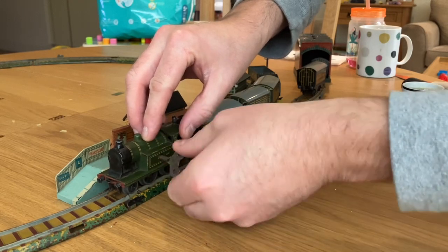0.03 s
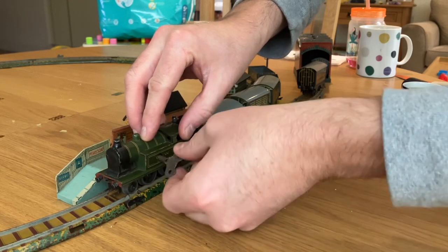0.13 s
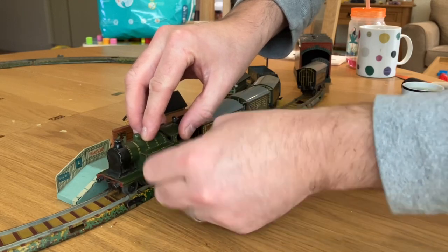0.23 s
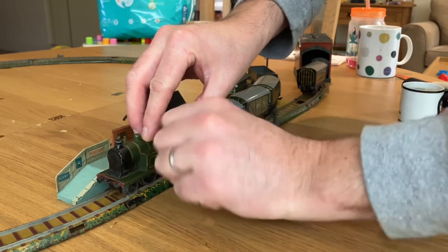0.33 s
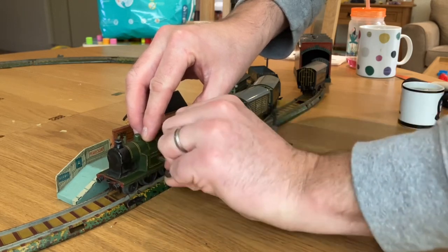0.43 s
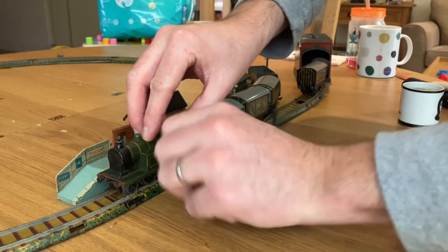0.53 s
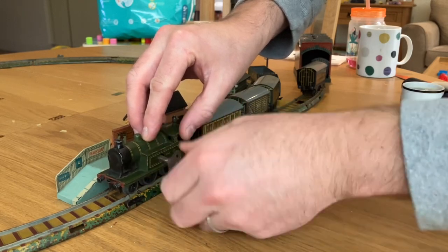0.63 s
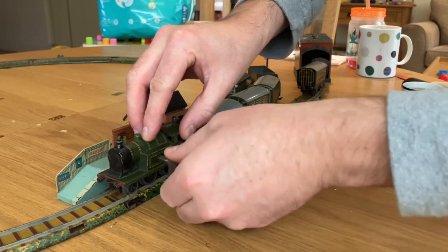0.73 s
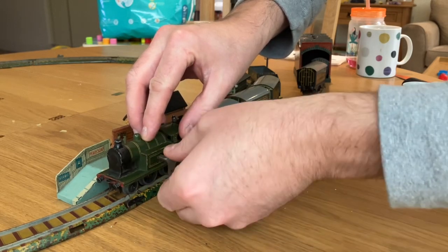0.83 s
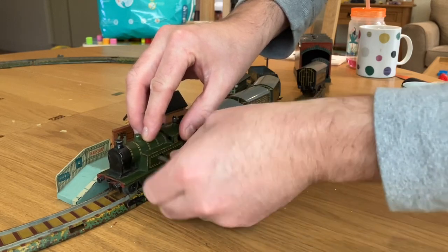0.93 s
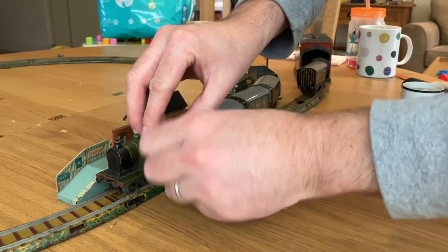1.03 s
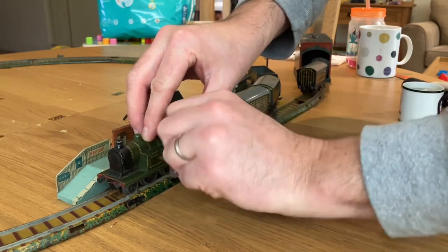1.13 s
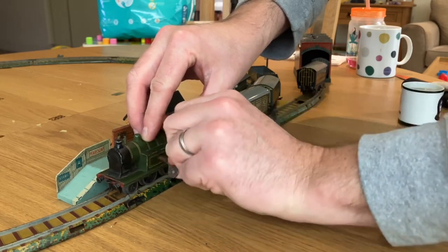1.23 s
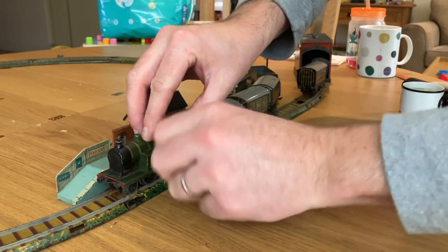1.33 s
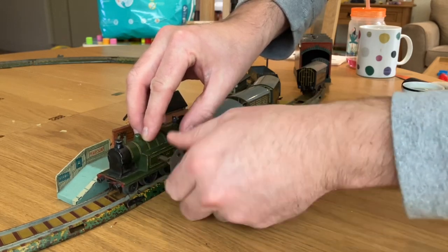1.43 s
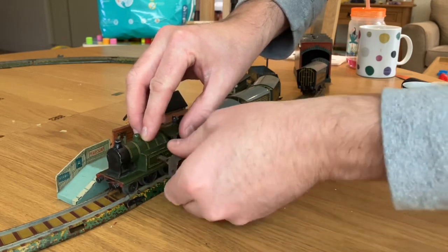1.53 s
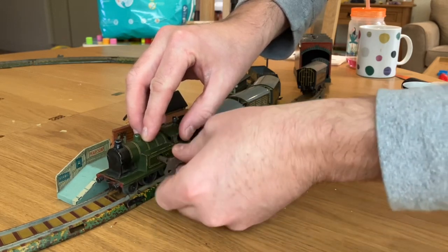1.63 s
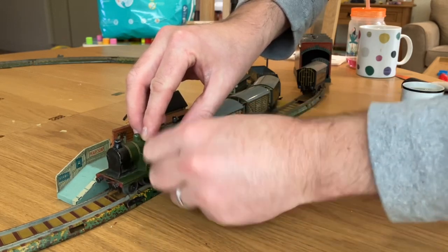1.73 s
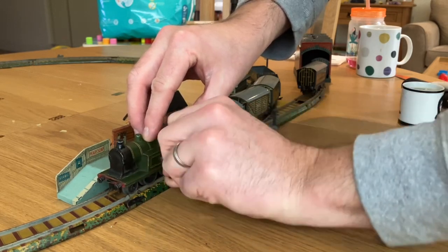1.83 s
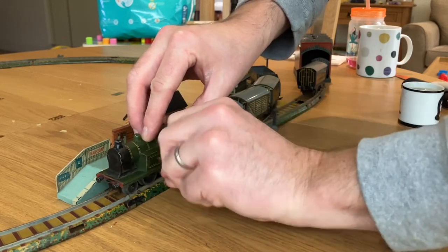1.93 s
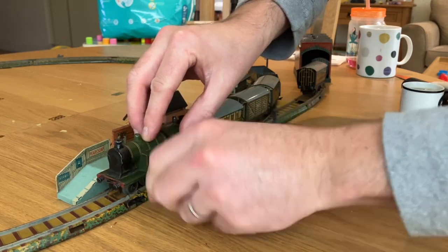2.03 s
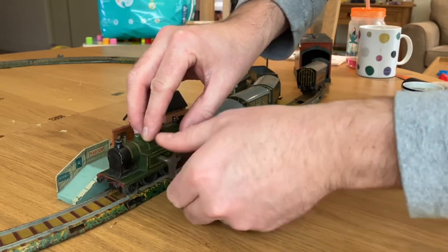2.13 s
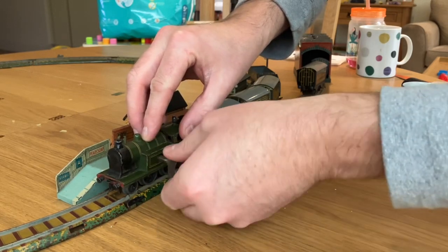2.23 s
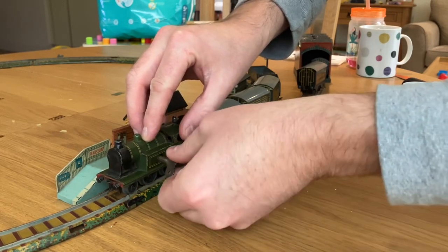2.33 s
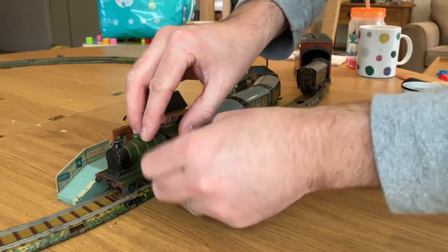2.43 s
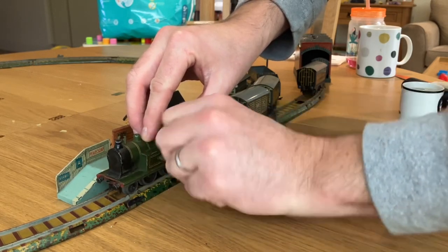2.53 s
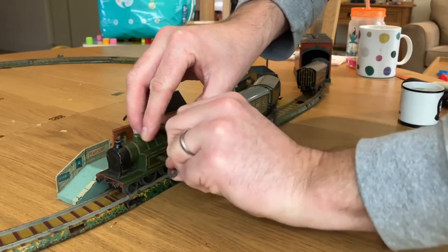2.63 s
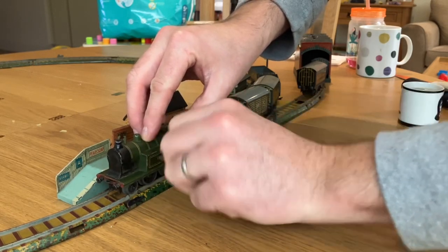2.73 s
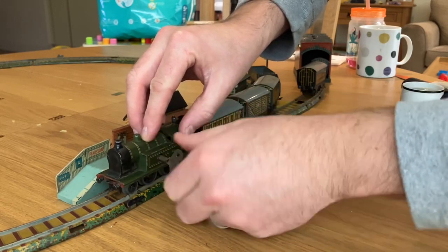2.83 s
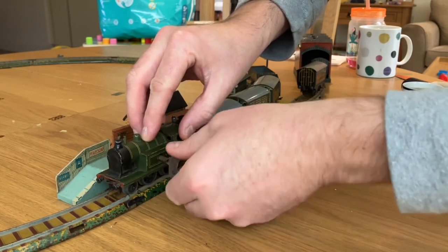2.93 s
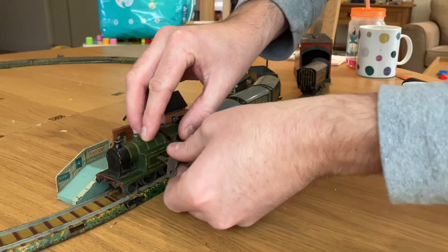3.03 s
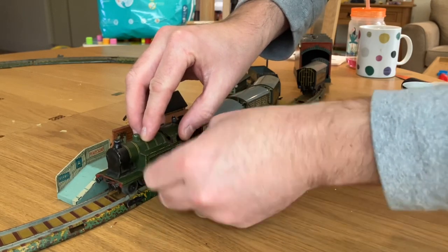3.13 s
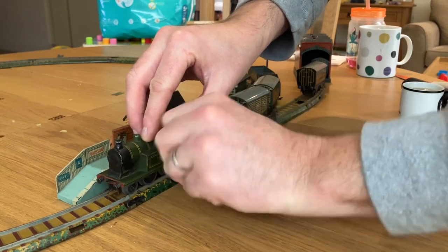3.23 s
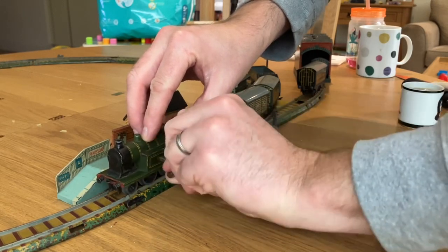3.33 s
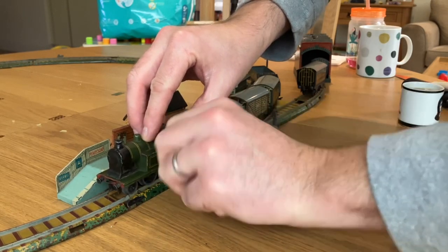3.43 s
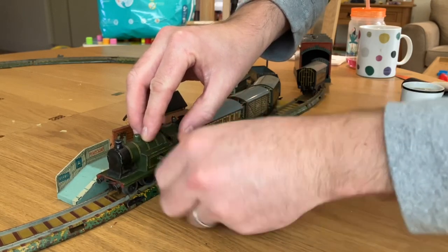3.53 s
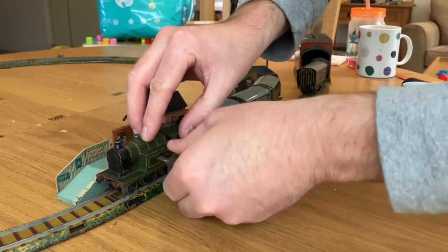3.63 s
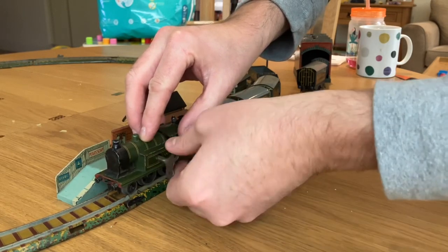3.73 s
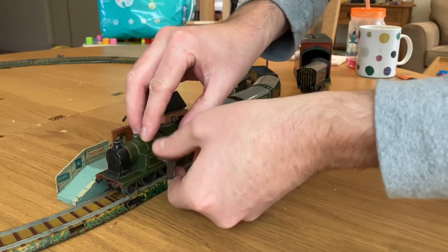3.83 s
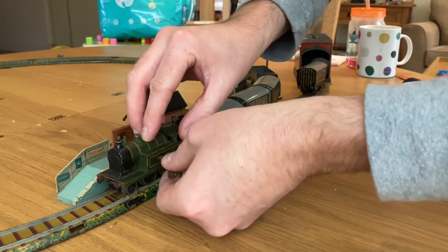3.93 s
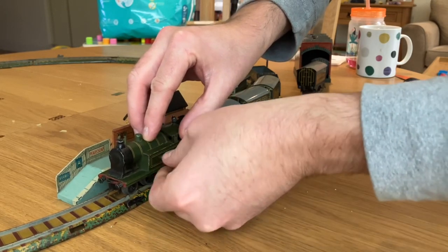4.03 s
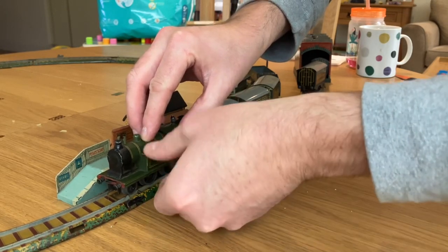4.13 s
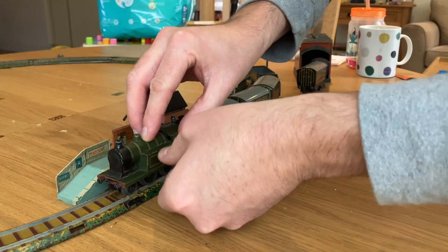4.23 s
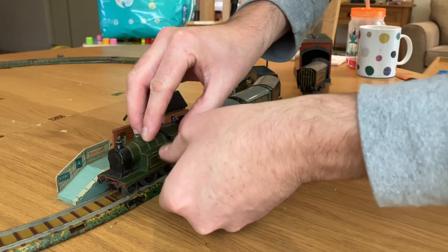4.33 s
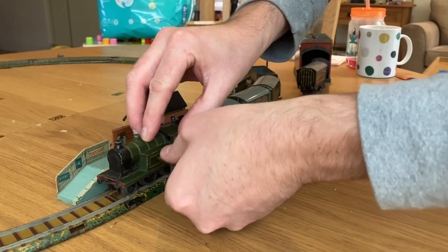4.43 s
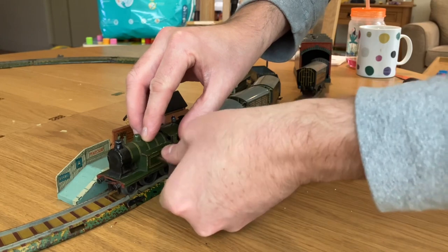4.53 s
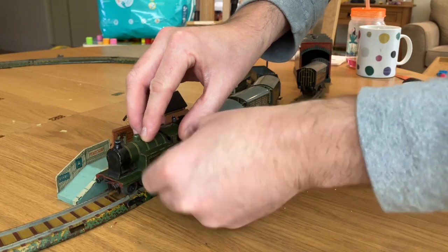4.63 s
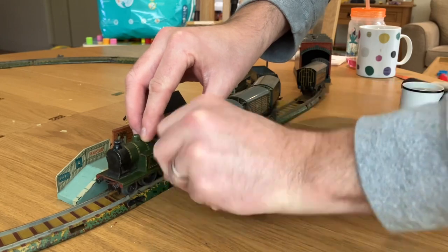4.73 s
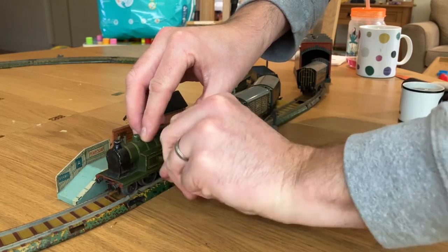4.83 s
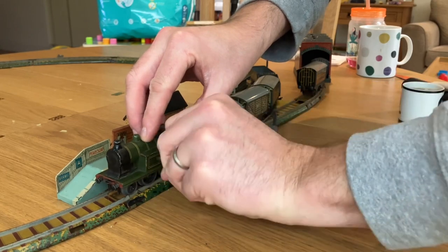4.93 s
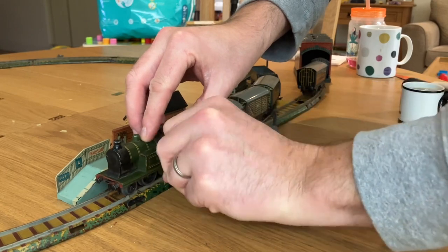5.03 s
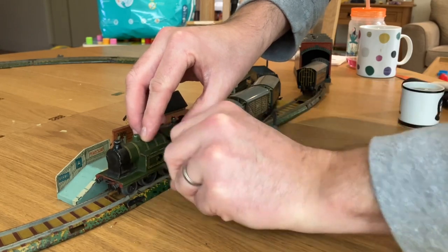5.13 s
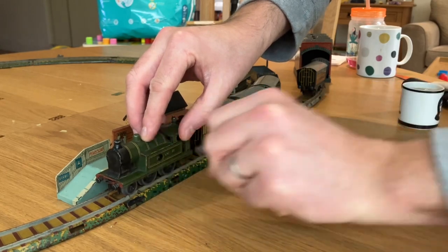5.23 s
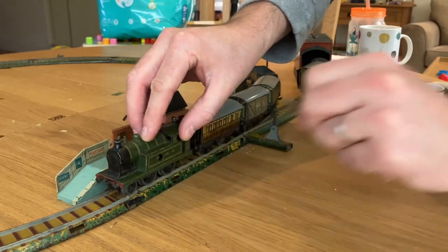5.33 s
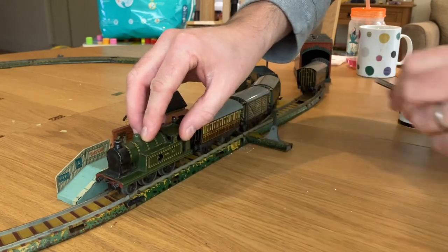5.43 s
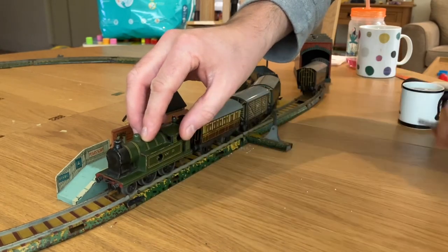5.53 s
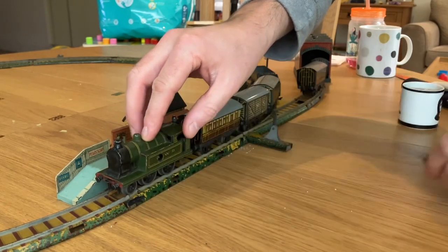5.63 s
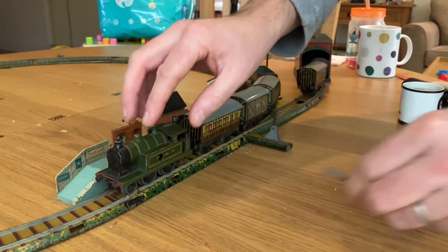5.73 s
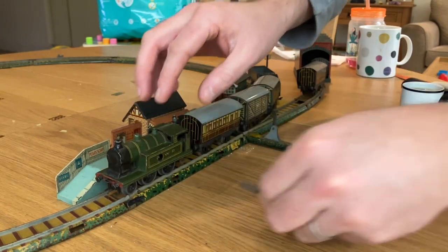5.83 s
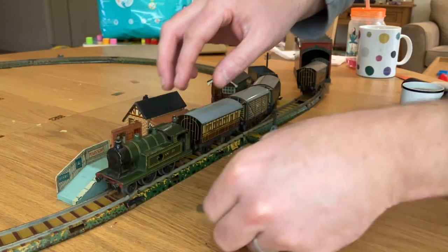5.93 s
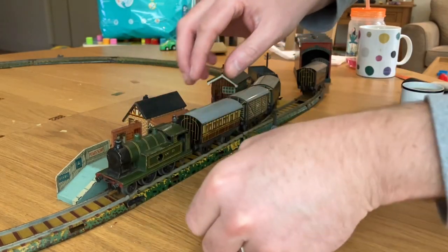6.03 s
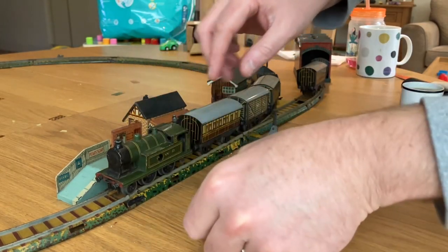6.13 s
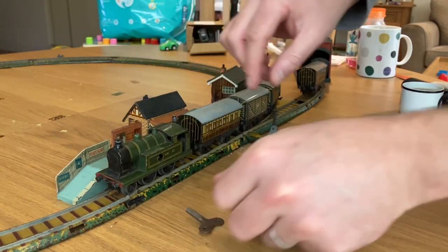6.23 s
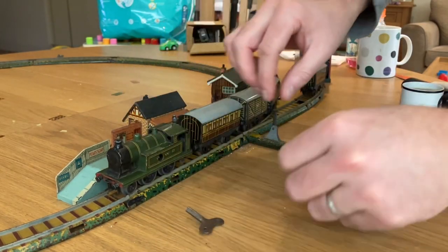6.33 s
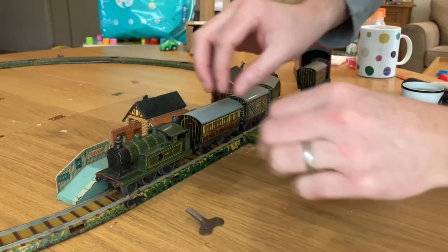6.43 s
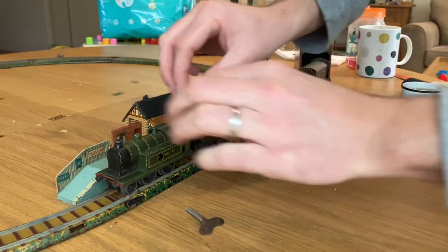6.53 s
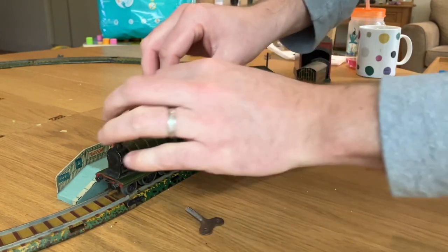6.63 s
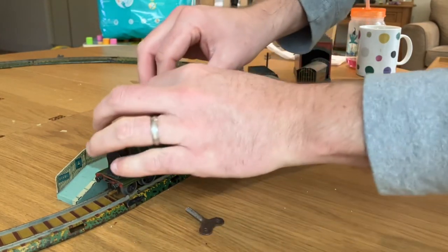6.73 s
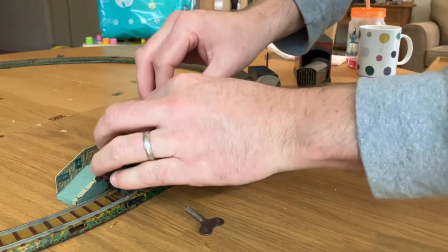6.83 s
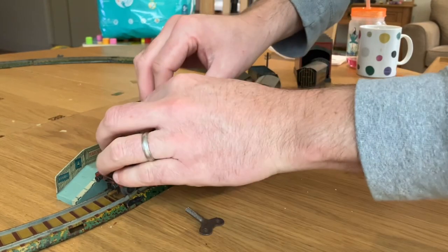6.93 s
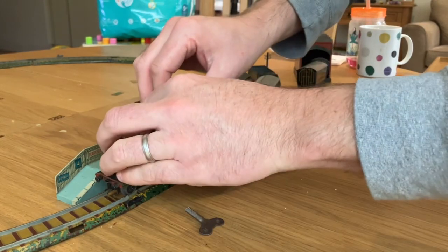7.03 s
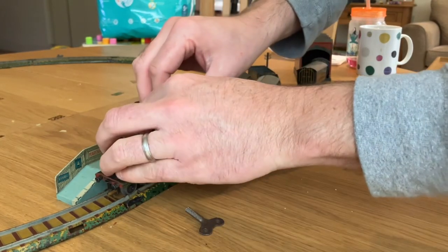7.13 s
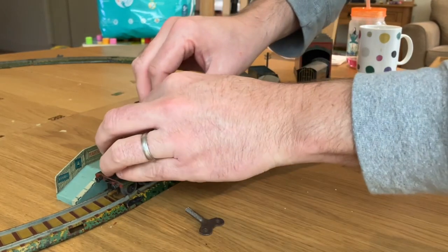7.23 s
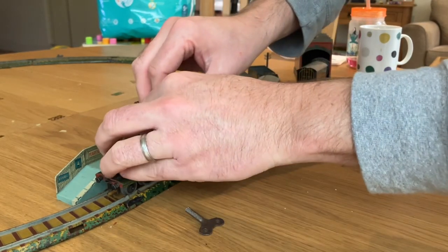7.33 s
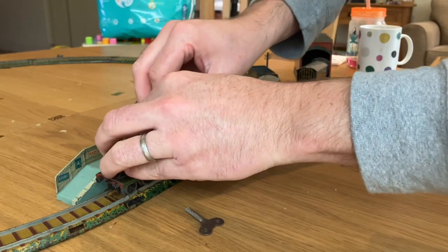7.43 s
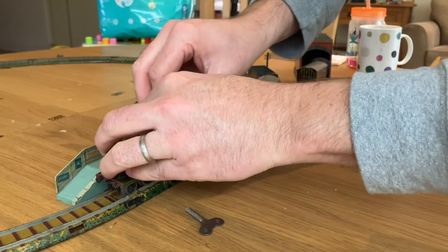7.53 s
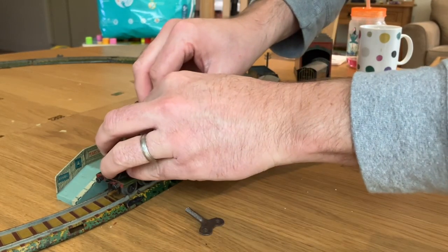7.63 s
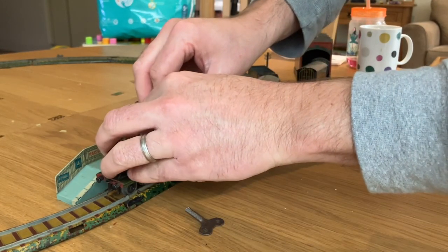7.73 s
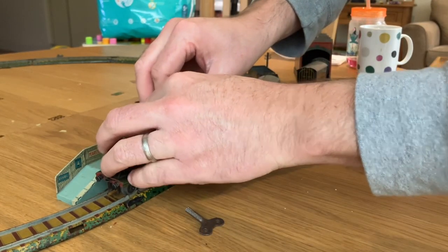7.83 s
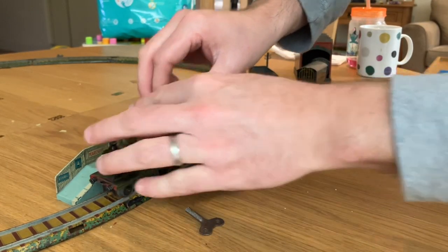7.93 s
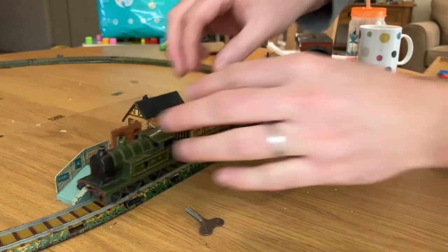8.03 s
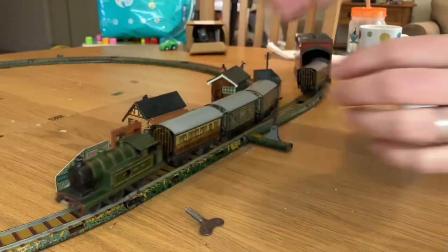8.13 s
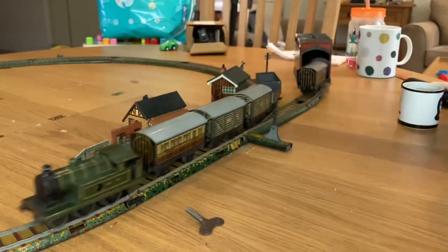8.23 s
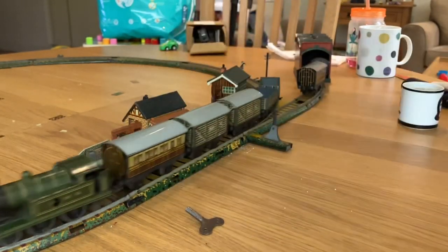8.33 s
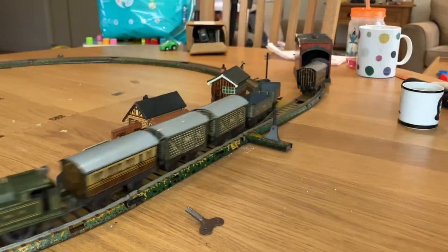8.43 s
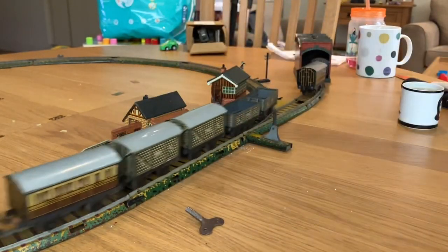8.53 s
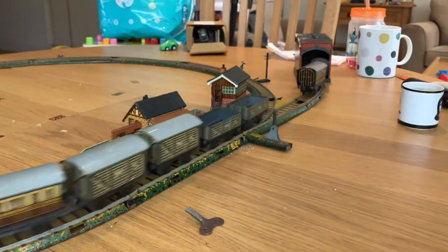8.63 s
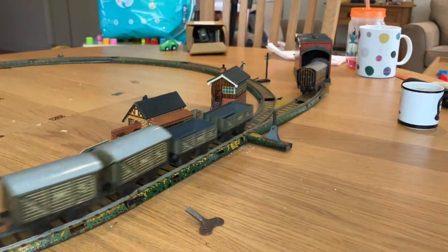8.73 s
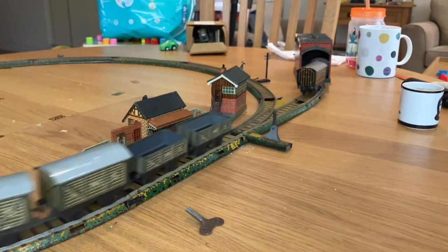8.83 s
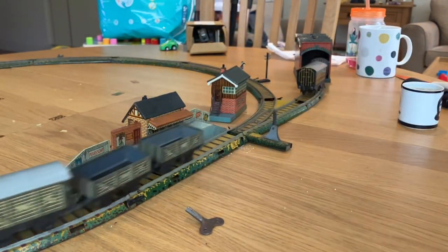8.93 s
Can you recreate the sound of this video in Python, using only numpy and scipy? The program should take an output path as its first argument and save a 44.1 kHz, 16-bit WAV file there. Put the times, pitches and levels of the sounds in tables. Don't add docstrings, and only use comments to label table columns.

```python
import sys
import numpy as np
from scipy import signal
from scipy.fft import rfft, irfft
from scipy.io import wavfile
from scipy.ndimage import uniform_filter1d

SR = 44100
rng = np.random.default_rng(int(sys.argv[2]) if len(sys.argv) > 2 else 0)


def file_out(sig):
    cols = np.atleast_2d(sig).T
    lim = np.clip(cols, -1, 1)
    pcm = np.round(lim * 32767).astype(np.int16)
    wavfile.write(sys.argv[1], SR, pcm)


def volts(x):
    e = np.asarray(x, float) / 20
    return 10 ** e


N = 396459


def rms_one(x):
    return x / np.sqrt(np.mean(x ** 2) + 1e-20)


def in_time(rows):
    s, *columns = np.transpose(rows)
    return [np.interp(np.arange(N) / SR, s, column) for column in columns]


def band(x, low_hz, high_hz):
    sos = signal.butter(2, [low_hz, min(high_hz, .45 * SR)], "band", fs=SR, output="sos")
    return signal.sosfilt(sos, x)


def no_bass(x):
    return signal.sosfilt(signal.butter(6, 930, "high", fs=SR, output="sos"), x)


def drift(rate_hz, size=N):
    knots = rng.standard_normal(1000)
    return np.interp(np.arange(size) * rate_hz / SR, np.arange(1000), knots)


def swell(start_s, end_s, db, rise_db_per_s, fall_db_per_s):
    t = np.arange(0, N, 32)[:, None] / SR
    early_s = np.maximum(start_s - t, 0)
    late_s = np.maximum(t - end_s, 0)
    gain = volts(db - rise_db_per_s * early_s - fall_db_per_s * late_s).sum(axis=1)
    return np.interp(np.arange(N) / SR, t[:, 0], gain)


def grains(per_s, uneven_db, shape):
    sizes = volts(uneven_db * np.minimum(rng.exponential(1, shape), 4)) * rng.choice([-1, 1], shape)
    return sizes * (rng.random(shape) < per_s / SR)


def ring(clicks, hz, t60):
    r, w = volts(-60 / (t60 * SR)), 2 * np.pi * hz / SR
    return signal.lfilter([0, np.sin(w)], [1, -2 * r * np.cos(w), r * r], clicks + 1e-18)


def strike(times, peak_db, modes, uneven_db, chatter_s, tilt_db=0, loudest_hz=None, detune=.05):
    hz, db, t60 = np.transpose(modes)
    draw = rng.standard_normal((len(times), 2, len(modes)))
    after = np.arange(600)
    fade = (after + 1) ** .5 * np.exp(-after / (chatter_s * SR))
    chatter = rng.choice([-1, 1], (len(times), 600)) * fade / np.sqrt(np.sum(fade ** 2))
    hz = hz * (1 + detune * np.clip(draw[:, 1], -2, 2))
    waves = np.exp(2j * np.pi * hz[..., None] / SR * after)
    reach = np.abs(np.sum(chatter[:, None] * waves, axis=2))
    db = db + uneven_db * np.clip(draw[:, 0], -1, 1)
    db = db + np.reshape(tilt_db, (-1, 1)) * np.log2(hz / 2000)
    if loudest_hz is not None:
        away = np.log2(hz / np.reshape(loudest_hz, (-1, 1))) / 0.2
        db = db + 9 * (np.exp(-away ** 2) - .5)
    gain = volts(np.reshape(peak_db, (-1, 1)) + db) / (reach + 0.65)
    t = np.arange(int(t60.max() * SR) + 1) / SR
    rings = 0
    for k in range(len(modes)):
        decay = np.exp(-np.log(1000) * t / t60[k])
        rings = rings + gain[:, [k]] * np.sin(2 * np.pi * hz[:, [k]] * t) * decay
    blows = signal.fftconvolve(rings, chatter, axes=1)
    at = (np.asarray(times) * SR).astype(int)[:, None] + np.arange(blows.shape[1])
    return np.bincount(at.ravel(), blows.ravel(), N)[:N]


def place(x, left_db, lag_s=0.00011):
    late = np.interp(np.arange(N) - lag_s * SR, np.arange(N), x)
    return np.array([x * volts(left_db / 2), late * volts(-left_db / 2)])


def scattered(x, width_hz):
    sos = signal.butter(2, width_hz, fs=SR, output="sos")
    return x * rms_one(signal.sosfilt(sos, rng.standard_normal(N)))


# pitch_hz, level_db
QUIET_ROOM = [(15, -42), (25, 12), (83, -4), (257, -9), (790, -29.5), (1240, -12), (1540, -25.5),
              (3730, -17), (4500, -27), (7890, -28), (9270, -57.5), (10900, -29.5), (15000, -63.5)]


def room_tone():
    hz = np.fft.rfftfreq(N, 1 / SR) + 1
    colour_hz, colour_db = np.transpose(QUIET_ROOM)
    colour = volts(np.interp(np.log(hz), np.log(colour_hz), colour_db))
    mid, side = rfft(rng.standard_normal((2, N)))
    alike = np.clip(.9 - hz / 1800, 0, 1)
    ears = np.sqrt(1 + alike) * mid + np.sqrt(1 - alike) * side * [[1], [-1]]
    return volts(-63 + 1.5 * drift(5.4)) * rms_one(irfft(colour * ears, N))


# pitch_hz, t60_s, level_db
ECHO_BANDS = [(158.6, 0.67, -8), (514, 0.15, -4), (1436, 0.33, -4.5), (3470, 0.41, -13.5),
              (6000, 0.46, -16), (12900, 0.054, -7)]


def room(x):
    t, out = np.arange(SR // 2) / SR, 0
    turn = np.cumsum(np.abs(drift(7))) * 18.0 / SR
    for share in (np.cos(turn), np.sin(turn)):
        echo = 0
        for hz, t60, db in ECHO_BANDS:
            noise = band(rng.standard_normal((2, len(t))), hz / 1.6, hz * 1.75)
            both, apart = noise * volts(-60 * t / t60) * (t > .003)
            ears = both + np.clip(hz / 1500, .35, 1) * apart * [[1], [-1]]
            echo = echo + volts(db) * ears / np.sqrt(0.014 * SR)
        out = out + signal.fftconvolve(x * share, echo, axes=1)[:, :N]
    return out


# pitch_hz, level_db, t60_s
TABLE_MODES = [(73.3, -24.5, 0.32), (118.5, -2.5, 0.16), (207, -4.5, 0.04), (306, -4.5, 0.019),
               (474, -9, 0.016)]


def table_top(shake, deep_db):
    modes = sum(volts(db) * rms_one(ring(shake, hz, t60)) for hz, db, t60 in TABLE_MODES[1:])
    deepest = rms_one(ring(shake, TABLE_MODES[0][0], t60=0.53))
    wood = modes + volts(-4.0) * rms_one(band(shake, 110, 1400))
    return rms_one(wood) + volts(deep_db) * deepest


# time_s, skin_movement_db, weight_on_table_db
HANDS_MOVING = [(0, -57.5, -55.5), (.7, -61, -62), (1.45, -60, -59), (2.1, -59.5, -59), (2.3, -72, -70),
                (3.0, -69, -78), (3.69, -55, -63), (4.05, -54.5, -55.5), (4.4, -80, -70), (5.2, -73, -65.5),
                (5.92, -65, -71), (6.08, -72, -60.5), (6.25, -47.5, -55), (6.55, -78.5, -71.5),
                (6.93, -67.5, -61.5), (7.26, -76, -78), (7.45, -59, -51), (7.65, -87, -89)]
# start_s, length_s, level_db
FINGER_STROKES = [(3.652, 0.032, -56), (4.04, 0.1, -60), (5.504, 0.067, -68.5), (5.621, 0.022, -64),
                  (6.013, 0.11, -62), (7.34, 0.075, -62)]
# start_s, length_s, level_db
WRIST_PRESSES = [
    (2.832, 0.027, -60),
    (3.417, 0.24, -71),
    (7.366, 0.058, -54),
]


def hands():
    move_db, weight_db = in_time(HANDS_MOVING)
    first, last = np.reshape([row[0] for row in PAWL_SNAPS], (-1, 4))[:, [0, 3]].T
    rise, fall = 195.5, 151
    grip = swell(first - 0.051, first + 0.051, -56.5, rise, fall)
    lean = swell(first, last, -50, rise, fall)
    s, length_s, db = np.transpose(WRIST_PRESSES)
    lean = lean + swell(s, s + length_s, db, 2001.5, fall)
    sleeve = swell(first + 0.05, last + 0.05, -62.5, 245.5, 59)
    back = last + 0.27
    sleeve = sleeve + swell(back, back + 0.02, -59, 208, 208)

    slips = grains(350 * volts(3.3 * drift(25)), 5.2, N)
    scrape = sum(volts(db) * ring(slips, hz, t60) for hz, db, t60 in TIN_MODES[:10])
    scrape = rms_one(no_bass(band(scrape, 600, 3800)))
    scrape *= (volts(move_db) + grip) * volts(-8.0)
    hiss = rms_one(band(grains(2500.0, 1.9, N), 2700, 21000))
    hiss *= (volts(move_db - 13.5) + sleeve) * volts(-4.5 + 6.7 * drift(37))
    rumble = table_top(rng.standard_normal(N), deep_db=-10.5)
    rumble *= (volts(weight_db) + lean) * volts(-9.5 + 3.3 * drift(55))

    s, length_s, db = np.transpose(FINGER_STROKES)
    rough = slips + grains(1500.0, 2.5, N)
    drag = sum(ring(rough, hz, 0.11 * t60) for hz, _, t60 in WOOD_MODES[1:6])
    drag = rms_one(band(drag, 380, 2300))
    drag *= swell(s, s + length_s, db, 2001.5, 302)
    skin = place(drag, left_db=2.5) + place(scrape, left_db=1.0)
    return skin + place(hiss, left_db=-0.9) + place(rumble, left_db=6.5)


# start_s, length_s, level_db
METAL_SLIDES = [(0.28, 0.017, -52), (.325, .02, -61), (0.492, 0.013, -54), (0.914, 0.022, -51),
                (1.02, 0.018, -72), (1.175, 0.023, -64), (3.183, .015, -52), (3.4, 0.022, -61.5),
                (4.047, .05, -57), (4.342, 0.028, -63), (5.05, 0.025, -61.5), (5.205, .04, -63),
                (5.322, 0.045, -72), (5.487, 0.065, -65.5), (5.635, 0.0091, -65.5), (5.995, .05, -60.5),
                (6.076, 0.082, -50.5), (6.372, 0.033, -59.5), (6.635, 0.014, -77), (6.743, .08, -75),
                (6.95, 0.074, -76), (7.097, 0.12, -85), (7.786, .03, -63), (7.863, .03, -59)]


def slides():
    s, length_s, db = np.transpose(METAL_SLIDES)
    fine = grains(2700.0, 3.8, (2, N))
    chatter = 0
    for k, (hz, _, t60) in enumerate(TIN_MODES[:11]):
        chatter = chatter + volts(-1.5 * np.log2(hz / 2000)) * rms_one(ring(fine[k % 2], hz, 0.9 * t60))
    return place(rms_one(chatter) * swell(s, s + length_s, db, 2001.5, 210), left_db=1.5)


# time_s, knock_peak_db, ring_over_knock_db, tilt_db_per_octave
KEY_BOUNCES = [(5.996, -23, -41, -6), (6.078, -17.5, -9, 7), (6.083, -21, -30, 3.5),
               (6.105, -19.5, -39, -9), (6.124, -20.5, 7, 9), (6.151, -20, -3, -6),
               (6.166, -15.5, -15, -7.5), (6.18, -21, -32, -3.5), (6.203, -42.5, -22, -16.5),
               (6.223, -33, 0.5, 8.5), (6.269, -38, -28, -12.5)]
# pitch_hz, level_db, t60_s
WOOD_MODES = [(235.6, -19, 0.028), (510, -12, 0.021), (933, -12, 0.018), (1194, -3, 0.026),
              (1570, -8, 0.036), (2000, -13, 0.014), (2290, 5, 0.02), (2700, -7, 0.011), (3320, 13, 0.0072),
              (4280, 7.5, 0.011), (5500, 5.5, 0.0032), (6940, -26, 0.00047), (11500, -5, 0.0028)]
# pitch_hz, level_db, t60_s
KEY_MODES = [(7009, -1, .26), (7036, -12, .3), (9620, -28, .12), (11540, -24, .15)]


def dropped_key():
    s, knock_db, ring_db, tilt_db = np.transpose(KEY_BOUNCES)
    knock = strike(s, knock_db - 12.0, WOOD_MODES, 2.0, .00035, tilt_db)
    flat_s, flat_db = 6.204, -10
    ring_db = knock_db + ring_db - 9.5 - flat_db * (s > flat_s)
    damped = volts(flat_db * np.clip((np.arange(N) / SR - flat_s) / .004, 0, 1))
    steel = strike(s, ring_db, KEY_MODES, uneven_db=1.0, chatter_s=.00001, detune=0)
    return band(knock, 470, 18000) + damped * steel


# time_s, body_peak_db, hardness_db_per_octave, loudest_pitch_hz
KEY_CLINKS = [(0.096, -41, 5, 3400), (0.175, -36.5, -1, 1140), (0.228, -34.5, 4, 1930),
              (0.473, -28, -2.5, 1620), (0.508, -21.5, -13, 1460), (0.544, -48, 7.5, 3260),
              (0.806, -55, 5, 3400), (0.866, -35.5, 7.5, 3580), (0.922, -41, 4.5, 3120),
              (1.218, -32.5, 0.5, 5500), (1.558, -46, 12, 1620), (1.917, -34, 2, 5500),
              (1.95, -27, -13, 2220), (2.072, -42.5, -6, 1240), (2.293, -40.5, 8.5, 3400),
              (2.655, -43, 7, 3520), (3.033, -33.5, 1, 3400), (3.391, -32.5, 2, 2980),
              (3.415, -30.5, -7, 1690), (4.527, -42, 12, 3600), (4.883, -41.5, 6.5, 5500),
              (5.049, -45, -6, 1620), (5.071, -43, 6.5, 5500), (5.094, -45, 7.5, 5500)]
# time_s, body_peak_db, hardness_db_per_octave, loudest_pitch_hz
FINGER_BUMPS = [(0.758, -38, -10.5, 1360), (0.854, -37, -12.5, 1100), (1.27, -33, -8, 2980),
                (2.354, -27.5, -4, 1690), (2.75, -37, -4, 1300), (3.63, -59.5, 7.5, 3550),
                (3.663, -39.5, -13, 1577), (3.728, -32.5, -7.5, 1350), (3.912, -30.5, 1.5, 1770),
                (4.04, -39, -20, 1240), (4.065, -31.5, -11, 1350), (4.079, -44.5, 0.5, 1370),
                (4.121, -34, -16, 1090), (4.167, -27.5, -14, 1370), (4.353, -46.5, -8.5, 3660),
                (4.383, -35.5, -4.5, 1690), (4.58, -32, -5, 1690), (4.689, -34.5, -24.5, 1310),
                (4.924, -42.5, -5.5, 3400), (5.201, -34.5, -10.5, 3240), (5.341, -45, -11, 1000),
                (5.486, -31, -12, 1620), (5.533, -56, -17, 1560), (5.652, -38.5, -5, 1190),
                (5.993, -34.5, -17.5, 1200), (6.383, -34, -10.5, 1160), (6.528, -45, -11, 1840),
                (6.748, -56, -3, 1314), (6.837, -45.5, -12, 1246), (6.963, -54, -14, 1295),
                (7.06, -51.5, -22, 1150)]
# time_s, body_peak_db, hardness_db_per_octave, loudest_pitch_hz
SLACK_KNOCKS = [(7.313, -28.5, -13, 1620), (7.359, -43, 7.5, 1620), (7.385, -25.5, -13, 1620),
                (7.787, -31.5, -16, 1620), (7.866, -21, -11.5, 1050), (7.976, -24, -10, 1190),
                (8.004, -33, -1, 1240), (8.015, -25.5, -1, 3640), (8.085, -21.5, -12, 1200)]


def taps():
    # rows, bright crack over body (dB), crack gained per dB of hardness, wood over body (dB)
    kinds = [(KEY_CLINKS, 11.5, 0.89, -29),
             (FINGER_BUMPS, 6, 2.2, -24),
             (SLACK_KNOCKS, 0.5, 2.2, -26)]
    return sorted((s, db, crack_db + slope * tilt, wood_db - 0.44 * tilt, tilt, hz)
                  for rows, crack_db, slope, wood_db in kinds for s, db, tilt, hz in rows)


# time_s, snap_peak_db, tin_over_snap_db, table_over_snap_db
PAWL_SNAPS = [(0.199, -2.5, -25, -48.5), (0.2523, -2, -40, -35), (0.2989, -2.5, -25, -45.5),
              (0.3589, -1.5, -34, -41), (0.9438, -4, -23, -22.5), (1.0058, -1.5, -26.5, -36.5),
              (1.0521, 0, -32, -34), (1.1427, -1.5, -24.5, -32), (1.6543, -2, -22.5, -48),
              (1.709, -4, -19, -25), (1.749, -4.5, -22.5, -30), (1.7997, -2.5, -26.5, -34),
              (2.3885, -6, -20.5, -36.5), (2.4488, -4, -16.5, -53.5), (2.5016, -7, -22, -51.5),
              (2.5943, -4.5, -24.5, -30.5), (3.1186, -4, -19, -47), (3.1696, -6, -20, -23.5),
              (3.213, -6.5, -22.5, -27), (3.272, -8, -20, -42), (4.6088, -10, -13.5, -28),
              (4.6637, -7.5, -29, -20.5), (4.7063, -9.5, -20.5, -56), (4.7954, -10.5, -19.5, -53)]
# time_s, peak_db
TABLE_THUMPS = [(0.204, -28), (0.508, -31.5), (0.645, -40.5), (0.922, -36), (1.016, -47), (1.565, -43.5),
                (1.664, -36.5), (1.952, -37.5), (2.329, -40), (2.4, -39), (2.449, -33), (2.659, -39.5),
                (2.841, -33.5), (2.864, -37.5), (2.89, -43), (2.928, -51), (3.133, -41.5), (3.42, -37),
                (3.438, -33.5), (3.474, -38.5), (3.571, -36), (3.869, -43), (3.952, -40.5), (3.976, -41),
                (4.077, -39), (4.624, -38), (4.706, -45), (4.929, -43), (5.204, -45.5), (5.493, -46),
                (7.361, -41.5), (7.382, -32)]
# pitch_hz, level_db, t60_s
PAWL_MODES = [(6520, -11.5, 0.0023), (7220, 0, 0.0087), (7970, 4, 0.0074), (9050, -8.5, .002),
              (11200, 0, 0.0022), (11940, 5.5, 0.0031), (12110, 11, 0.0061), (13200, 0.5, .002),
              (14460, 8, 0.0032), (15900, -12.5, .002)]
# pitch_hz, level_db, t60_s
TIN_MODES = [(985, -14, 0.013), (1230, -19.5, 0.006), (1330, -17, 0.027), (1666, -11.5, 0.028),
             (1834, -8, 0.005), (2220, -19.5, 0.0033), (2514, 0, 0.0039), (3024, -0.5, 0.013),
             (3400, 3, 0.02), (3970, 2, 0.014), (4223, 0, 0.0078), (4834, -5, 0.0077), (5430, 9.5, 0.0029)]
FREE_PANELS = [(3400, 6700, 1700, 3600), (2980, 1800, 3770, 1550), (1690, 1690, 1690, 4900),
               (2860, 9500, 4900, 4700), (1770, 3300, 2500, 1300), (1620, 3300, 2500, 4100)]


def winding():
    s, snap_db, tin_db, table_db = np.transpose(PAWL_SNAPS)
    tap_s, tap_db, bright_db, dull_db, tilt_db, tap_hz = np.transpose(taps())
    thump_s, thump_db = np.transpose(TABLE_THUMPS)
    pawl_s, shell_s, instant_s = .00035, .0016, .00001

    tighter = 2.5 * s
    snaps = strike(s + 0.0032, snap_db - 15 - 2 * tighter, PAWL_MODES, 2.0, pawl_s, tighter, detune=0.031)
    snaps += volts(-14.5) * np.roll(snaps, int(.002 * SR))
    snaps += strike(tap_s + 0.0026, tap_db + bright_db - 9.5, PAWL_MODES, 2.0, chatter_s=.0012)

    shell = strike(s + 0.0047, snap_db + tin_db - 1, TIN_MODES, 7.0, shell_s, loudest_hz=FREE_PANELS)
    shell += strike(tap_s + 0.0022, tap_db - 2.0, TIN_MODES, 6.0, shell_s, tilt_db, loudest_hz=tap_hz)
    shell = no_bass(band(band(shell, 820, 7900), 820, 9500))

    table = strike(s + 0.0026, snap_db + table_db - 0.5, TABLE_MODES, 4.5, instant_s, detune=0.018)
    table += strike(thump_s, thump_db + 0.5, TABLE_MODES, 3.0, instant_s, detune=0.029)
    table += strike(tap_s + 0.0032, tap_db + dull_db + 18.0, WOOD_MODES[:2], 8.5, instant_s)
    soft = band(table, 75, 420)
    axle = strike(s + 0.00395, snap_db + tin_db - 11, WOOD_MODES[:3], 10.5, pawl_s)
    return no_bass(snaps), shell, soft + band(axle, 160, 950)


def rattle(level_db, centre_hz, octaves, per_s, cycles, uneven_db, left_db, count=16):
    start = int(RUNNING[0][0] * SR)
    shape = (2, N - start)
    beat = 1 + .5 * np.sin(2 * np.pi * 76 * np.arange(shape[1]) / SR)
    hits = grains(per_s * beat, uneven_db, shape)
    dealt = rng.integers(0, count, shape)
    offsets = np.linspace(-1, 1, count)
    pitches = np.minimum(centre_hz * 2 ** (octaves * offsets), .4 * SR)
    rings = 0
    for k, (offset, hz) in enumerate(zip(offsets, pitches)):
        rings = rings + volts(-9 * offset ** 2) * rms_one(ring(hits * (dealt == k), hz, cycles / hz))
    engine, coaches = np.pad(rms_one(rings), ((0, 0), (start, 0))) * volts(level_db)
    return place(engine, left_db, lag_s=0.000273) + 0.9 * place(coaches, left_db, lag_s=-0.00006)


# time_s, level_db
RUNNING = [
    (7.85, -82),
    (7.9, -56.5),
    (8.06, -55),
    (8.135, -41.5),
    (8.25, -35.5),
    (8.46, -31),
    (8.63, -30),
    (8.78, -28),
    (8.99, -27),
]
# time_s, buzz_over_running_db
ENGINE_BUZZ = [(7.85, 1), (8.2, -4.5), (8.36, -1.5), (8.45, -4), (8.58, -2.5), (8.68, -8), (8.77, -5),
               (8.85, -12), (8.99, -14)]
# time_s, peak_db
GEAR_JERKS = [
    (7.864, -44),
    (7.989, -49),
    (8.02, -49),
]
# time_s, peak_db, loudest_pitch_hz
RAIL_JOINTS = [(8.135, -29, 1240), (8.165, -28, 1310), (8.214, -16, 1140), (8.2556, -17, 2980),
               (8.426, -14, 3680), (8.466, -9.5, 4230), (8.482, -16, 3400), (8.5091, -14.5, 2400),
               (8.572, -7, 1180), (8.6581, -7, 1220), (8.704, -11, 3260), (8.7284, -7, 3260),
               (8.768, -5, 1240), (8.8063, -10.5, 3260), (8.8332, -4, 4380), (8.8721, -13, 3270),
               (8.908, -4, 3400), (8.935, -16, 3260), (8.962, -2, 3400)]


def train():
    t = np.arange(N) / SR
    run_db, = in_time(RUNNING)
    jerk_s, jerk_db = np.transpose(GEAR_JERKS)
    since_engine_s = t - 8.68
    shake_db = 2.0 * drift(70)
    gear_db = 20 * np.log10(volts(run_db) + swell(jerk_s, jerk_s, jerk_db, 2500, 361.5))
    shell_db = gear_db + in_time(ENGINE_BUZZ)[0]
    wheel_db = run_db - 4 - 3.5 * since_engine_s
    rail_db = run_db - 13 + 22.5 * since_engine_s

    shell = rattle(shell_db + shake_db, 1258, octaves=0.452, per_s=1200.0, cycles=90.0, uneven_db=4.5, left_db=3.5)
    wheels = rattle(wheel_db + shake_db, 3280, octaves=0.944, per_s=2500.0, cycles=21.0, uneven_db=-2.5, left_db=4.5)
    gears = rattle(gear_db + shake_db, 8000, octaves=1.1, per_s=6400.0, cycles=15.0, uneven_db=2.0,
                   left_db=-1.7, count=12)
    rails = rattle(rail_db + shake_db, 3300, octaves=0.17, per_s=1800.0, cycles=120.0, uneven_db=10.0,
                   left_db=5.0, count=6)

    s, joint_db, joint_hz = np.transpose(RAIL_JOINTS)
    joints = no_bass(strike(s, joint_db - 7.0, TIN_MODES + PAWL_MODES, uneven_db=1.0, chatter_s=0.0045,
                            tilt_db=-2.5, loudest_hz=joint_hz))
    deep_db = np.maximum(-17, -88 * np.maximum(8.78 - t, 0))
    moving = np.clip((t - RUNNING[0][0]) / 0.0064, 0, 1)
    rumble_db = -40 + 0.48 * (run_db + 29.0)
    rumble = table_top(rng.standard_normal(N), deep_db) * moving * volts(rumble_db + 0.5)
    below = place(joints, left_db=2.5, lag_s=0.00023) + place(rumble, left_db=6.5)
    return rails + shell + wheels + gears + below


def scene():
    snaps, shell, table = winding()
    tin = place(snaps, left_db=-1.0) + place(shell, left_db=8.5)
    far = scattered(snaps, 1500) * volts(-2.5) + no_bass(scattered(shell, 350)) * volts(1.0)
    rest = place(table, left_db=4.0) + place(dropped_key(), left_db=4.0) + train() + hands() + slides()
    return tin + rest + room(rest + far) + room_tone()


def low_pass(x):
    return signal.sosfilt(signal.butter(12, 17110, fs=SR, output="sos"), x)


# low_hz, high_hz
THIN_BANDS = [(8650, 9650), (12930, 14000), (15620, 22500)]


def record(dry):
    dry = signal.sosfilt(signal.butter(4, 45, "high", fs=SR, output="sos"), dry)
    hz = np.fft.rfftfreq(N, 1 / SR)
    inside = sum(np.clip(np.minimum(hz - low, high - hz) / 220, 0, 1) for low, high in THIN_BANDS)
    starved = irfft(rfft(dry) * np.sin(np.pi / 2 * inside) ** 2, N)
    power = np.diff(dry, prepend=0).var(axis=0) + np.diff(dry[0], prepend=0) ** 2
    attack = uniform_filter1d(power, size=200) > 4 * uniform_filter1d(power, size=3000)
    kept = uniform_filter1d(attack * 1., size=128)
    ceiling = .95
    dry = ceiling * np.tanh((dry - starved * (1 - 0.29 * kept)) / ceiling)
    mix = signal.sosfiltfilt(signal.cheby2(10, 40, 17400, fs=SR, output="sos"), dry)
    return low_pass(mix)


dry = scene()
out = record(dry)
file_out(out)
```